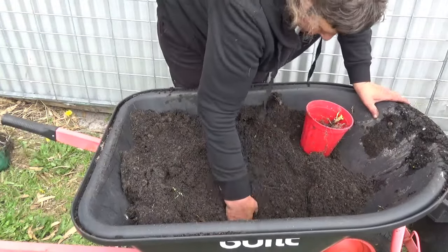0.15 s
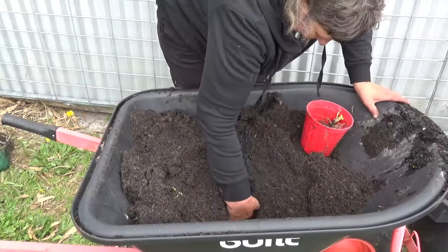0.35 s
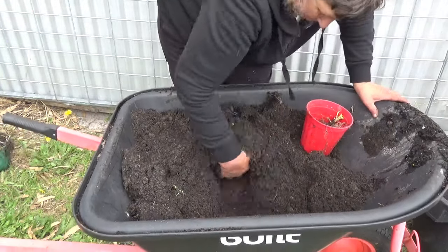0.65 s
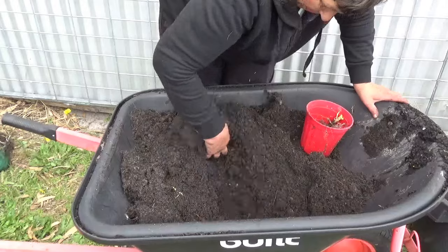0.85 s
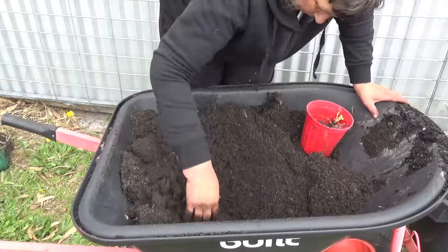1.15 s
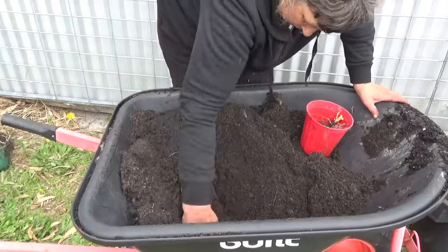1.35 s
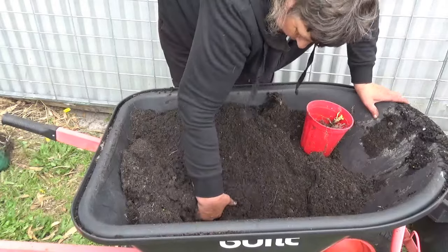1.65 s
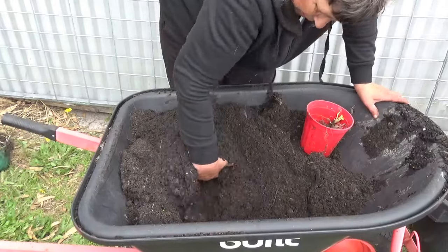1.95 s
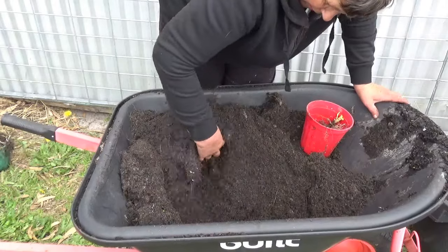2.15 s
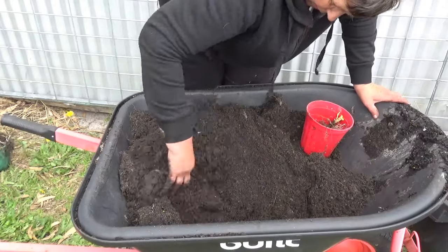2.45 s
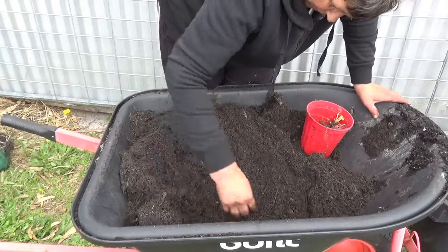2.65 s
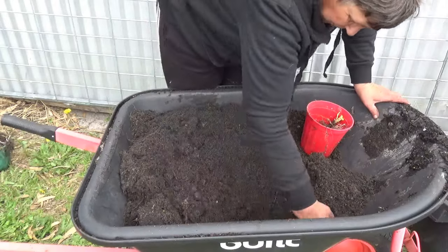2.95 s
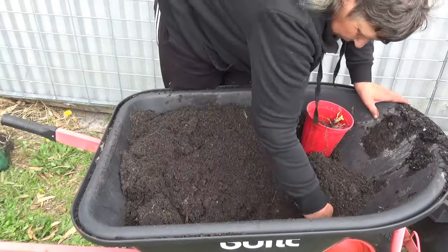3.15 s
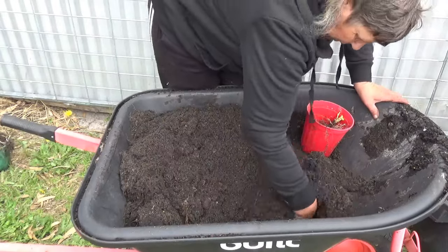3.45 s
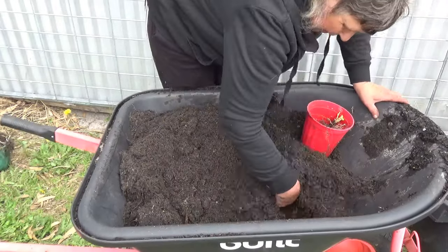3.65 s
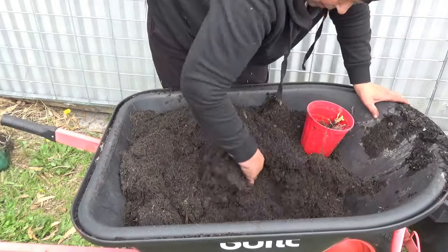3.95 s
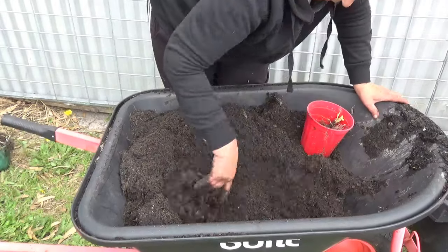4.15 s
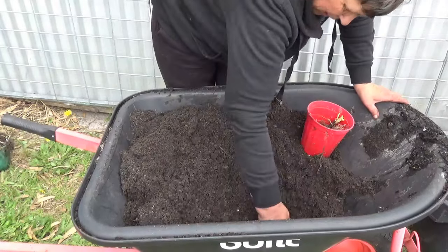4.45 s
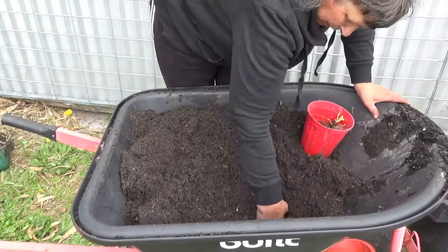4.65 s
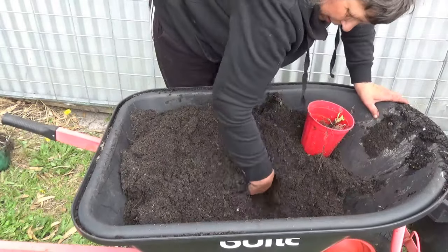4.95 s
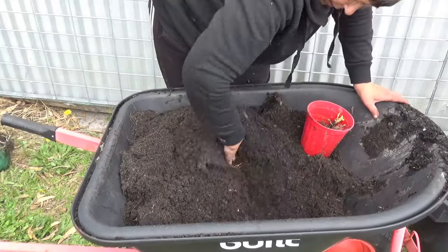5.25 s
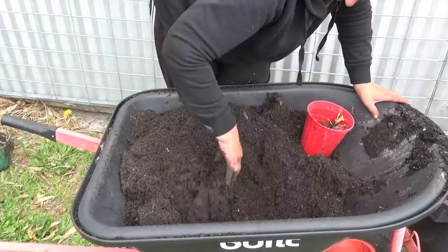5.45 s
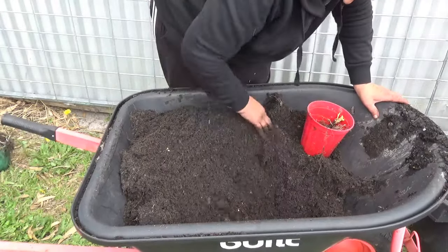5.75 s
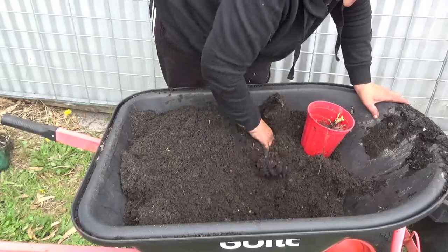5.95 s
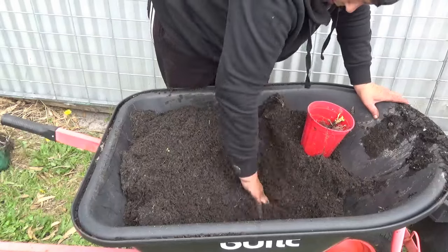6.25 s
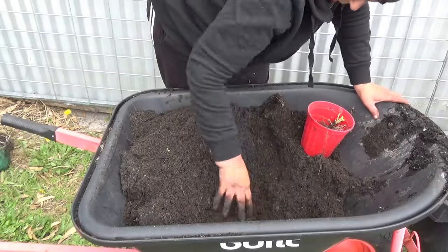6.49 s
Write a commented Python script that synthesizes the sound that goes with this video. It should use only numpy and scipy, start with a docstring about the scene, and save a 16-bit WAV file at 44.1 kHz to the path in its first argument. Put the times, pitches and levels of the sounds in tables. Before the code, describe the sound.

A hand rummages through loose potting soil in a plastic wheelbarrow, with sharp clicks, light knocks and distant birds.

```python
"""Close to the microphone, a bare hand digs through loose potting mix in a plastic wheelbarrow,
outdoors beside a metal fence. Crumbs rustle under each stroke, hard chips click against the tray
and some blows ring its hollow body. Puffs of wind rumble low on the stereo microphone. Behind,
in steady garden air, other birds screech and twitter far off and a songbird warbles."""
import sys
import numpy as np
from scipy import signal
from scipy.io import wavfile

SR = 44100
rng = np.random.default_rng(int(sys.argv[2]) if len(sys.argv) > 2 else 0)


def wav_out(sig):
    """Save sig, one row per channel (or a flat mono array), as 16-bit PCM at SR to the path in sys.argv[1]."""
    wavfile.write(sys.argv[1], SR, np.round(np.clip(np.atleast_2d(sig).T, -1, 1) * 32767).astype(np.int16))


N = 291942


def from_db(db):
    """Decibels to gain."""
    return 10 ** (np.asarray(db) / 20)


def rms_one(x):
    """Scale to unit rms."""
    return x / np.sqrt(np.mean(x ** 2) + 1e-20)


def at_hz(points, hz):
    """Read a curve on a log-frequency axis."""
    points = np.array(points)
    return np.interp(np.log(hz), np.log(points[:, 0]), points[:, 1])


def drift(rate):
    """Smooth random wander of unit rms that changes about rate times a second."""
    r = np.exp(-16 * np.pi * rate / SR)
    slow = signal.lfilter([1], [1, -2 * r, r * r], rng.standard_normal(N // 8 + 8002))[8000:]
    return np.interp(np.arange(N) / 8, np.arange(len(slow)), rms_one(slow))


def resonate(x, hz, width_hz):
    """A damped resonance with gain 1 at its peak."""
    r = np.exp(-np.pi * width_hz / SR)
    feedback = [1, -2 * r * np.cos(2 * np.pi * hz / SR), r * r]
    return signal.lfilter(np.array([1, 0, -1]) * (1 - r * r) / 2, feedback, x)


def add(out, s, sound):
    """Mix a short sound in at s seconds."""
    at = int(np.clip(round(s * SR), 0, N - 1))
    out[:, at:at + sound.shape[1]] += sound[:, :N - at]


def white():
    """Two unrelated (mid, side) pairs of noise, for alternate bands."""
    return rng.standard_normal((2, 2, N))


def colour(source, spectrum, flicker_db):
    """Shape (mid, side) pairs in half-octave bands, each flickering on its own; stereo, rms 1."""
    # how alike the microphone's two sides are: (frequency [Hz], correlation [0-1])
    likeness = [(60, 0.94), (250, 0.91), (700, 0.71), (3000, 0.6), (5000, 0.67), (7000, 1), (9000, 1)]
    out, edges = np.zeros((2, N)), 23.4 * 2 ** np.arange(0, 9.1, .5)
    for k, (low, high) in enumerate(zip(edges, edges[1:])):
        if high < spectrum[0][0] or low > spectrum[-1][0]:
            continue
        band = signal.butter(2, [low, high], "band", fs=SR, output="sos")
        mid, side = signal.sosfilt(band, source[k % 2])
        hz = np.sqrt(low * high)
        alike = np.clip(at_hz(likeness, hz), 0, 1)
        gain = from_db(at_hz(spectrum, hz) + flicker_db * np.tanh(drift(17.0)))
        out += gain * (mid + np.sqrt((1 - alike) / (1 + alike)) * side * [[1], [-1]])
    return rms_one(out)


def digging_db():
    """Levels of rub, grit and hiss: each stroke swells, holds and stops; loosened soil trickles on."""
    # hand strokes: (start [s], length [s], rub [dB], grit [dB], hiss [dB], trickle [dB re the stroke])
    strokes = [(0, 0.01, -45.5, -48, -53.5, -4), (0.076, 0.052, -48, -55, -59, -13),
               (.68, 0.47, -58, -59, -66, 0), (1.185, 0.088, -60.5, -64, -67, 3.5),
               (1.402, 0.23, -48.5, -50.5, -56, -9.5), (1.432, 0.042, -40.5, -53, -46.5, -22),
               (2.054, 0.33, -72, -65, -73, -0.5), (2.46, .38, -59, -61.5, -76, -1),
               (2.573, 0.094, -53.5, -63, -62.5, -8.5), (2.963, 0.21, -49, -51.5, -53.5, -5.5),
               (3.31, 0.5, -57.5, -65.5, -80, -1), (4.29, 0.17, -55.5, -60.5, -69, -2),
               (5.167, 0.79, -61, -72, -74, -1), (5.593, 0.052, -47, -51.5, -51, -23),
               (5.77, 0.066, -74, -60.5, -65, -12), (6.136, 0.18, -62, -69, -73, -2),
               (6.499, 0.11, -56.5, -64, -60.5, -5)]
    # how fast the trickle settles: (rub [dB/s], grit [dB/s], hiss [dB/s])
    settling = [13, 10.5, 18]
    # the hand only drifting through the mix: (rub [dB], grit [dB], hiss [dB])
    resting_db = [-63.5, -66, -74]
    attack_s, release_db_per_s = 0.028, 220
    t = np.arange(N) / SR
    power = from_db(resting_db)[:, None] ** 2 * np.ones(N)
    for s, length, *levels_db, trickle_db in strokes:
        after = np.maximum(t - s - length, 0)
        swell = np.clip((t - s) / attack_s, 0, 1) if s > .01 else 1   # the first is already under way
        release_db = np.maximum(-release_db_per_s * after, trickle_db - np.outer(settling, after))
        power += (swell * from_db(np.array(levels_db)[:, None] + release_db)) ** 2
    return 10 * np.log10(power)


def crumbs(per_s, spread_db, blur, width):
    """Countless tiny contacts of uneven size, over the blur of those too small to tell apart."""
    sizes = from_db(spread_db * np.minimum(rng.exponential(1, N), 4))
    contacts = rms_one(sizes * (rng.random(N) < per_s / SR) / np.sqrt(per_s))
    return white() * np.hypot(contacts, blur) * np.array([np.ones(N), width])


def soil():
    """Close up, the hand rubs through the mix; harder strokes drag more grit over the plastic."""
    # dull rubbing of hand on soil: (frequency [Hz], relative density [dB])
    rub_spectrum = [(70, -32), (120, -14), (185, -6.5), (346, -9.5), (500, -1.5), (800, -1), (1300, -2.5),
                    (2000, -3), (3000, -6.5), (5000, -16.5)]
    # sliding grit: (frequency [Hz], relative density [dB])
    grit_spectrum = [(700, -9), (1300, -9.5), (2200, -1.5), (3200, 2), (5000, 3.5), (6800, 2), (9000, -19),
                     (11500, -35)]
    # hiss of grit on the plastic: (frequency [Hz], relative density [dB])
    hiss_spectrum = [(6000, -11), (7500, 1), (9500, -3.5), (11500, -2.5)]
    rub_db, grit_db, hiss_db = digging_db()
    width = from_db(-.8 * np.clip(hiss_db + 64.5, 0, 10))   # near-wall scrapes arrive straight, narrow
    grit_per_s = 2500 * from_db(.5 * (grit_db + 56.5))
    rub = crumbs(per_s=2500, spread_db=1.5, blur=0.98, width=width)
    rub = from_db(rub_db) * colour(rub, rub_spectrum, flicker_db=3.5)
    grit = crumbs(grit_per_s, spread_db=1.5, blur=1.35, width=np.sqrt(width))
    grit = from_db(grit_db) * colour(grit, grit_spectrum, flicker_db=2.1)
    hiss = crumbs(grit_per_s, spread_db=4.5, blur=1.3, width=width)
    hiss = from_db(hiss_db) * colour(hiss, hiss_spectrum, flicker_db=0)
    return rub + grit + hiss


def garden_air():
    """The garden's faint background, all round the microphone."""
    # outdoor ambience: (frequency [Hz], relative density [dB])
    air_spectrum = [(15, -45), (25, -7.5), (128, -10.5), (545, 1.5), (1030, -6), (1470, -5), (2050, -6.5),
                    (2850, -7), (4630, -8.5), (5670, -11.5), (8100, -13), (10200, -17), (11000, -19),
                    (14300, -49), (22000, -120)]
    return from_db(-59) * colour(white(), air_spectrum, flicker_db=2.7)


def stray_chips(count):
    """Small chips that tick faintly at random moments, as rows of hits for chips()."""
    brightness_db, soft_hz = 4, 7500
    return [(when * N / SR, -70.5 - 2 * smallness, brightness_db, soft_hz, 0)
            for when, smallness in rng.random((count, 2))]


def tray_response(scatter_db, scatter_t60, tail_db, tail_t60, echo_s, echo_db, width):
    """From chip to microphone: direct path, quick scatter between the walls, one echo, a faint tail."""
    t = np.arange(SR // 6) / SR
    mid, side = rng.standard_normal((2, len(t)))
    decay = from_db(scatter_db - 60 * t / scatter_t60) + from_db(tail_db - 60 * t / tail_t60)
    response = (mid + width * side * np.array([[1], [-1]])) * decay * (t > .0006)
    response[:, 0] += 1
    response[:, int(echo_s * SR)] += from_db(echo_db)
    return response


def chips():
    """Each chip of bark or stone snaps once: small ones are brighter, soft ones miss the top modes."""
    # chips hitting the tray:
    # (time [s], level [dB], brightness [dB/octave], contact cutoff [Hz], left minus right [dB])
    hits = [(.0432, -52, -1, 7200, 3), (.0785, -42, -1.5, 6700, -1), (.0855, -47.5, 0, 9500, 2),
            (.688, -50, 3, 2880, 3), (1.0489, -43.5, 6, 3300, 5), (1.0564, -43.5, .5, 2900, -0.5),
            (1.278, -55.5, 1, 3700, -3), (1.3147, -60, 2, 15000, .5), (1.3598, -49, 6.5, 6900, 3),
            (1.4312, -48.5, -1.5, 5500, .5), (1.4704, -51, -6.5, 7000, 1), (1.625, -53.5, -2.5, 7000, 1.5),
            (2.0156, -66, 7.5, 6000, -4), (2.096, -66.5, 8.5, 6000, 0), (2.615, -55, 3, 6500, 5),
            (2.643, -55, 1.5, 6500, 2), (2.769, -33, 9, 4150, 2), (4.3138, -59.5, 5, 12000, 1),
            (4.3573, -66, 7, 8500, -5), (4.3653, -58.5, -4, 11000, .5), (4.437, -60, -1, 11000, 3),
            (5.6175, -40.5, 5.5, 12100, 0.5), (5.643, -56.5, 6, 14000, 1), (6.501, -64.5, 6.5, 9000, 2),
            (6.5424, -47.5, 4.5, 16000, 0), (6.5709, -53, 9, 3400, -1.5)]
    # heavily damped modes of a snap: (frequency [Hz], nominal width [Hz])
    chip_modes = [(1100, 1050), (2900, 1550), (5700, 2840), (9600, 1660)]
    out, blow = np.zeros((2, N)), signal.unit_impulse(SR // 100)
    rings = [resonate(resonate(blow, hz, 1.47 * width), hz, 1.47 * width) for hz, width in chip_modes]
    modes = np.array([(-1) ** k * rms_one(ring) for k, ring in enumerate(rings)])
    mode_hz, pivot_hz = np.array(chip_modes)[:, 0], 3000
    for s, level_db, brightness_db, soft_hz, pan_db in hits + stray_chips(count=11):
        contact = 1 / np.hypot(1, (mode_hz / soft_hz) ** 4)
        snap = (contact * from_db(level_db + brightness_db * np.log2(mode_hz / pivot_hz))) @ modes
        tray = tray_response(scatter_db=-25.5, scatter_t60=0.021, tail_db=-35.5, tail_t60=0.11,
                             echo_s=0.0089, echo_db=-16, width=0.22)
        pan = from_db([[pan_db / 2], [-pan_db / 2]])
        add(out, s, signal.fftconvolve(snap[None], tray, axes=1) * pan)
    return out


def knocks():
    """The soil-laden tray answers a blow with a short hollow ring; soft blows stir mainly low modes."""
    # blows that reach the tray's body: (time [s], level [dB], contact cutoff [Hz])
    blows = [(0.079, -48.5, 1500), (0.087, -39, 400), (1.05, -57, 1500), (1.433, -61.5, 700),
             (1.622, -55, 500), (2.771, -57.5, 900), (4.365, -54, 1200), (4.438, -60, 500),
             (5.619, -52, 1500), (6.543, -43.5, 170), (6.57, -49, 170)]
    # modes of the plastic shell: (frequency [Hz], relative level [dB], time to fall 60 dB [s])
    tray_modes = [(164.5, -10.5, 0.2), (213, -5, 0.13), (289, -7.5, 0.063), (352, -1.5, 0.11),
                  (514, -8, 0.063), (572, 3, 0.054), (809, 11, 0.047), (950, 9, .05), (1120, 3, 0.056),
                  (1307, 11.5, 0.04)]
    out, t = np.zeros((2, N)), np.arange(SR // 4) / SR
    hz, level_db, t60 = np.transpose(tray_modes)[:, :, None]
    rings = np.sin(2 * np.pi * hz * t) * from_db(level_db - 60 * t / t60)
    for s, blow_db, soft_hz in blows:
        strength = from_db(blow_db + 0.81 * rng.standard_normal(hz.shape)) / np.hypot(1, hz / soft_hz)
        pickup = rng.choice([-1, 1], len(hz)) * (1 + 0.18 * rng.standard_normal((2, len(hz))))
        add(out, s, pickup @ (strength * rings))
    low_cut = signal.butter(2, 120, "high", fs=SR, output="sos")   # the knocks carry no deep bass
    return signal.sosfilt(low_cut, out + 1e-18)


def wind():
    """Low rumble that swells and dies as each puff passes the microphone, partly its own at each port."""
    # puffs of wind: (peak time [s], half length [s], level [dB], deep share of the power [0-1])
    puffs = [(.82, .19, -62, 0.94), (.935, .055, -52.5, 1), (5.2, 0.034, -49.5, 0),
             (5.356, 0.056, -54.5, 0.02), (5.616, 0.18, -58, 0.14)]
    # spectra of a deep puff and a light one, each: (frequency [Hz], relative density [dB])
    puff_spectra = [
        [(21, -48), (35, -23), (60, -4.5), (107, -1.5), (216, -9), (386, -7), (600, -24), (780, -45),
         (1320, -120)],
        [(21, -44), (35, -22.5), (195, 2.5), (298, -9), (347, 8), (435, -8.5), (700, -14.5), (910, -44),
         (1540, -120)],
    ]
    t, ports = np.arange(N) / SR, np.array([[1], [1.3]])   # (mid, side)
    power = np.zeros((2, N))   # (deep, light)
    for s, half_s, level_db, depth in puffs:
        swell = from_db(level_db) / (1 + ((t - s) / half_s) ** 2 / 2) ** 1.38   # power-law skirts
        power += np.outer([depth, 1 - depth], swell ** 2)
    return sum(gain * colour(white() * ports, spectrum, flicker_db=-1.0)
               for gain, spectrum in zip(np.sqrt(power), puff_spectra))


def outdoors(x, wet_db, t60, delay_s):
    """Add scattered returns from fence, trees and walls, different left and right."""
    t = np.arange(SR // 2) / SR
    tail = rng.standard_normal((2, len(t))) * from_db(-60 * t / t60) * (t > delay_s)
    tail /= np.sqrt(np.sum(tail ** 2, axis=1, keepdims=True))
    return x + from_db(wet_db) * signal.fftconvolve(x[None], tail, axes=1)[:, :N]


def screeches():
    """Far-off birds: each call is a gliding tone, torn into a band of noise by a rough throat."""
    # hoarse calls and twitters: (start [s], length [s], from [Hz], to [Hz], width [Hz], level [dB])
    calls = [(1.773, 0.059, 1980, 1727, 160, -55), (1.819, 0.016, 2380, 2190, 250, -48.5),
             (3.038, 0.12, 1400, 1318, 259, -49), (3.52, 0.1, 2690, 4580, 1380, -48.5),
             (4.02, 0.34, 4780, 4480, 300, -67), (4.541, 0.123, 4640, 4460, 141, -63),
             (5.298, 0.21, 4450, 4370, 350, -67.5), (6.098, 0.12, 2596, 4040, 560, -56)]
    out, t = np.zeros(N), np.arange(N) / SR
    for s, length, from_hz, to_hz, width_hz, level_db in calls:
        progress = np.clip((t - s) / length, 0, 1)
        hz = from_hz + (to_hz - from_hz) * np.sin(np.pi / 2 * progress)
        phase = 2 * np.pi * np.cumsum(hz) / SR
        rough = drift(width_hz / 2) * np.cos(phase) + drift(width_hz / 2) * np.sin(phase)
        out += from_db(level_db) * np.sin(np.pi * progress) * rough
    return outdoors(out, wet_db=-4.5, t60=0.32, delay_s=0.008)


def songbird():
    """Across the garden, trembling whistles scoop, glide and sag; distance dulls the highest ones."""
    # whistled notes: (start [s], length [s], from [Hz], to [Hz], opening scoop [Hz],
    # closing fall [Hz], level [dB], fade over the note [dB])
    notes = [(1.965, 0.078, 1640, 1890, 3, -2, -61.5, -3), (2.02, 0.24, 1962, 1840, -130, 140, -52, 6),
             (2.303, 0.06, 1905, 1860, 0, 53, -56.5, 2), (2.43, .08, 2190, 2205, 54, 37, -45.5, -3),
             (2.578, 0.095, 3100, 3100, 7, 240, -49, 1), (2.64, 0.28, 1980, 1814, 431, 50, -46, 10.5),
             (2.92, 0.12, 1900, 1865, -28, 34, -55.5, -9), (3.007, .055, 3340, 3430, -230, 60, -50, 3),
             (3.014, 0.19, 2360, 1970, -200, 18, -43, 1), (3.23, 0.079, 2165, 2143, 4, 40, -54, -5),
             (3.265, 0.1, 1650, 1550, 80, 20, -53, 5), (3.296, 0.058, 2066, 2040, 0, 20, -55, 0),
             (3.682, 0.154, 2190, 2030, 2, 40, -61, 0), (4.055, 0.13, 2240, 2213, -81, 51, -60.5, 0),
             (4.402, .07, 4900, 4950, -120, 0, -58, 0), (4.444, 0.1, 2030, 2065, 0, 4, -61, 2),
             (4.586, .1, 2630, 2660, 11, 44, -63, 0), (4.935, .225, 5260, 4660, -560, 0, -63, 0),
             (5.143, .07, 4650, 4200, 0, 0, -61, 0)]
    scoop_s, sag_s, dull_hz = .023, 0.0173, 4200
    out, flutter = np.zeros((1, N)), from_db(3.1 * drift(47))
    tremble = 1 + .0025 * drift(50)
    for s, length, from_hz, to_hz, scoop_hz, fall_hz, level_db, fade_db in notes:
        t = np.arange(int(length * SR)) / SR
        progress = t / length
        hz = from_hz + (to_hz - from_hz) * progress + scoop_hz * np.exp(-t / scoop_s)
        hz = (hz - fall_hz * np.exp((t - length) / sag_s)) * tremble[int(s * SR):][:len(t)]
        whistle = np.sqrt(2) * np.sin(2 * np.pi * np.cumsum(hz) / SR)
        arch = np.sin(np.pi * progress) ** 0.48 * from_db(level_db - fade_db * (progress - .5))
        strength = arch / np.hypot(1, (hz / dull_hz) ** 2)
        add(out, s, (strength * whistle)[None])
    return outdoors(out[0] * flutter, wet_db=-8, t60=0.64, delay_s=0.053)


def scene():
    """The digging close by, wind on the microphone, birds and garden air behind."""
    return garden_air() + soil() + chips() + knocks() + wind() + songbird() + screeches()


def record(dry):
    """The recorder cuts the top off steeply."""
    cutoff_hz = 11150
    return signal.sosfilt(signal.ellip(10, .2, 60, cutoff_hz, fs=SR, output="sos"), dry)


dry = scene()
out = record(dry)
wav_out(out)
```